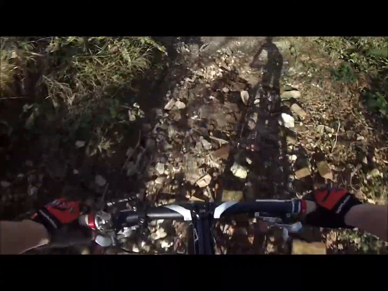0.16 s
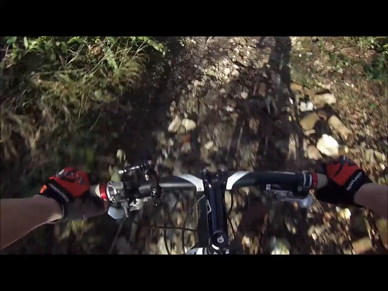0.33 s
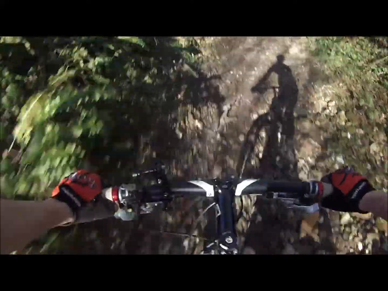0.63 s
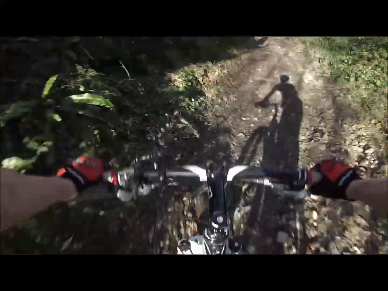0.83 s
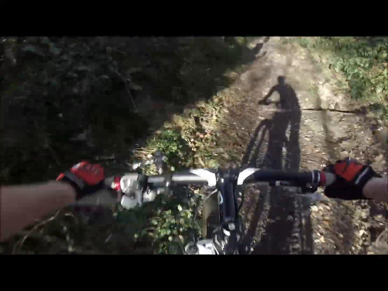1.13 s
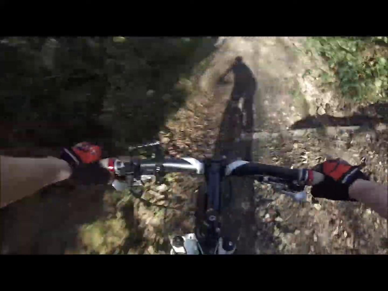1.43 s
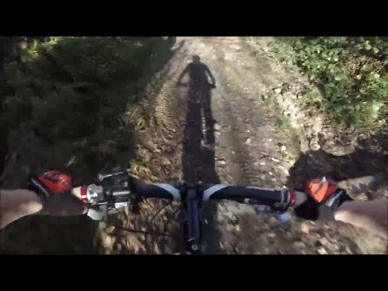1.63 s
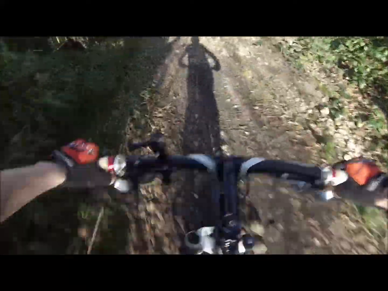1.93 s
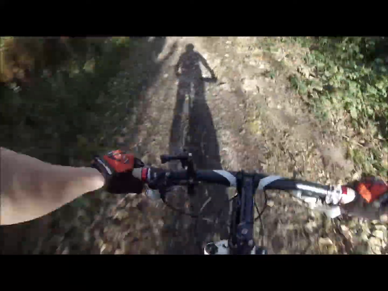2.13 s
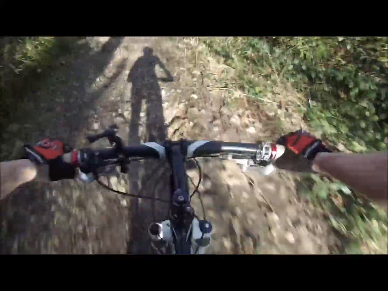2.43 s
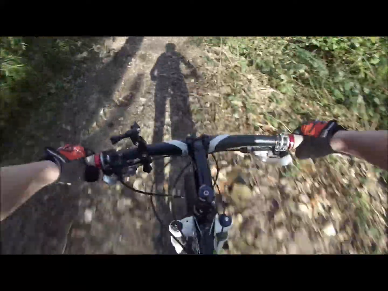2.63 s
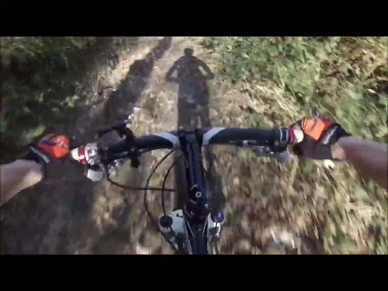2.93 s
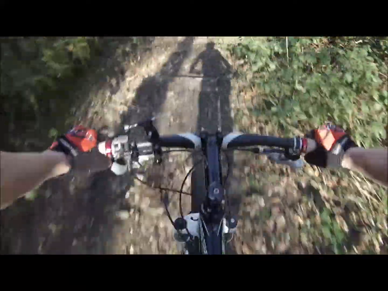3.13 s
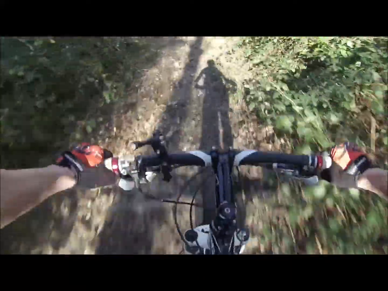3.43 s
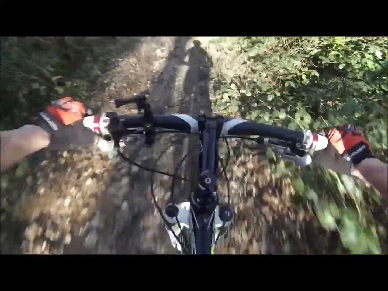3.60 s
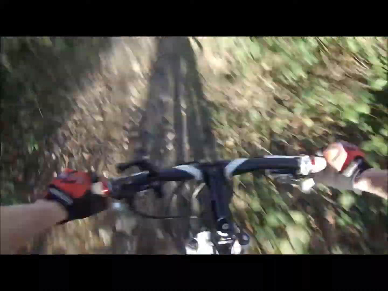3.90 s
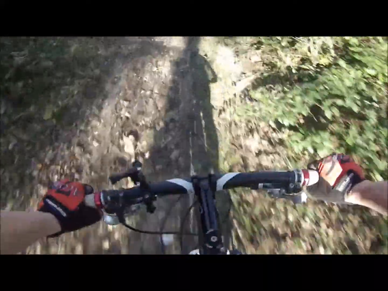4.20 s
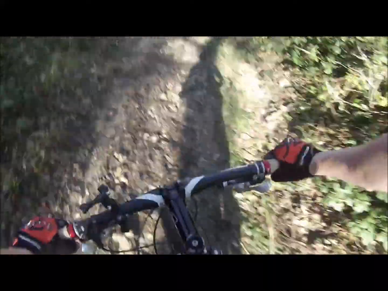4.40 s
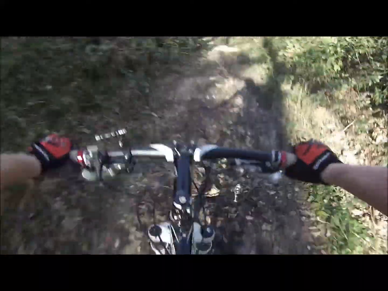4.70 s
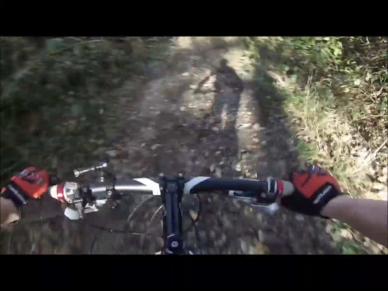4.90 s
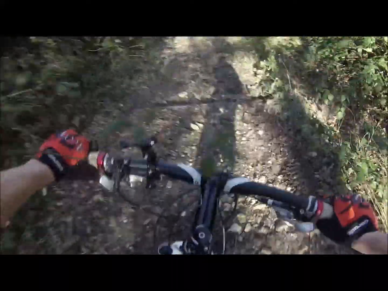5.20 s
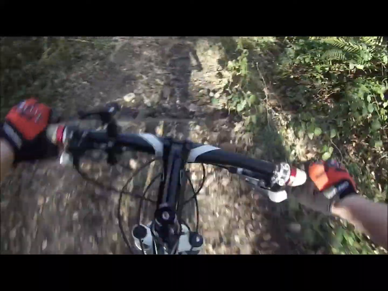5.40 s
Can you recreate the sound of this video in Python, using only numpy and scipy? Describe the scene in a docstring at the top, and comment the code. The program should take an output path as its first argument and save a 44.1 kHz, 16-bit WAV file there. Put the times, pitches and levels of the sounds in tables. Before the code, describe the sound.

A mountain bike rides down a stony dirt trail, heard close from a cased microphone on the rider's chest. The tyres crunch and fizz over gravel throughout, and quick, irregular bumps each bring a dull thump and a rattling spray over a low rumble. Flung stones clack against the bike and the chain chinks now and then. From about halfway, the frame gives several hard, hollow knocks.

```python
"""Mountain bike on a stony trail

A downhill ride, heard from a cased camera on the rider's chest. The tyres crunch over gravel; each bump
thumps the case and sets off a rattling spray. Flung stones clack against the bike, the frame gives
hard hollow knocks and the chain chinks. The shaken case rumbles, and its resonances colour the fizz."""
import sys
import numpy as np
from scipy import signal
from scipy.io import wavfile

SR = 44100
rng = np.random.default_rng(int(sys.argv[2]) if len(sys.argv) > 2 else 0)


def waveform_to_disk(signal):
    """Save audio, clipped to [-1, 1], as 16-bit WAV at the path in sys.argv[1]."""
    frames = np.transpose(np.atleast_2d(signal))
    scaled = np.clip(frames, -1, 1) * 32767
    samples = np.round(scaled).astype(np.int16)
    wavfile.write(sys.argv[1], SR, samples)


N = 244755
TIME = np.arange(N) / SR


def amp(db):
    """Decibels to gain."""
    return 10 ** (np.asarray(db) / 20)


def unit(x):
    """Scales to rms 1."""
    return x / np.sqrt(np.mean(x ** 2) + 1e-20)


def add(mix, s, sound):
    """Mixes a sound in at time s."""
    part = mix[max(round(s * SR), 0):][:len(sound)]
    part += sound[:len(part)]


def fader(curve):
    """Gain over time from a dB curve."""
    return amp(np.interp(TIME, *np.transpose(curve)))


def colour(x, spectrum, peaks=(), size=16384):
    """Minimum-phase EQ: a broad curve plus narrow peaks and dips."""
    hz = abs(np.fft.fftfreq(size, 1 / SR))
    f, db = np.transpose(spectrum)
    db = np.interp(np.log(hz + 1), np.log(f + 1), db)
    for centre, width, lift in peaks:
        db = db + lift / (1 + (2 * (hz - centre) / width) ** 2)
    log_response = np.conj(signal.hilbert(np.log(amp(db))))
    impulse = np.fft.ifft(np.exp(log_response)).real
    return signal.fftconvolve(x, impulse)[:len(x)]


def noise(spectrum, n=N):
    """Noise of rms 1 through an EQ curve of (f/Hz, level/dB) points."""
    return unit(colour(rng.standard_normal(n), spectrum))


def wander(depth_db, per_s):
    """A gain that drifts at random, by depth_db rms."""
    knots = rng.standard_normal(N // 20)
    return amp(depth_db * unit(np.interp(TIME * per_s, np.arange(len(knots)), knots)))


def grit(per_s, spread_db):
    """Tiny random impacts, a few much larger than the rest."""
    size = amp(spread_db * np.minimum(rng.exponential(1, N), 4))
    return unit(size * rng.choice([-1, 1], N) * (rng.random(N) < per_s / SR))


def ring(modes, tilt_db_per_oct=0, rise_s=0.0013):
    """Dying modes of alternating sign; the tilt brightens those above 700 Hz."""
    t = np.arange(SR // 6) / SR
    out = np.zeros(len(t))
    for k, (hz, db, t60) in enumerate(modes):
        lift_db = tilt_db_per_oct * max(np.log2(hz / 700), 0)
        out += (-1) ** k * amp(db + lift_db - 60 * t / t60) * np.cos(2 * np.pi * hz * t)
    return out * (1 - np.exp(-t / rise_s))


# Fader ride of the tyres rolling between bumps: t/s, level/dB
ROLL_FADER = [(0, -41), (.17, -42.5), (.24, -48.5), (.33, -37), (.64, -41.5), (.85, -40), (1.4, -44.5),
              (1.9, -46), (2.15, -43), (2.33, -45.5), (2.75, -42.5), (3.12, -37.5), (3.53, -49),
              (3.72, -43), (4.02, -49.5), (4.68, -40.5), (4.98, -41.5), (5.5, -47)]
# Coarse gravel crunch, heard through the case: f/Hz, level/dB
CRUNCH_EQ = [(300, -11), (520, -21), (690, -11.5), (860, -16), (1080, -9), (1350, -1), (1560, 2),
             (1880, -8.5), (2110, -3.5), (2400, -10.5), (2730, -8), (2950, -52), (4000, -53.5)]
# Fine sandy fizz, heard through the case: f/Hz, level/dB
FIZZ_EQ = [(2000, -26.5), (2900, -1.5), (3900, -4), (4300, -6.5), (5050, 2), (5600, -8), (6400, -7),
           (7300, -19), (8100, -20), (9800, -23), (10500, -19), (11300, -25.5), (13500, -29.5),
           (15500, -46)]
# Narrow peaks and dips of the case: f/Hz, width/Hz, gain/dB
CASE_RESONANCES = [(3120, 210, 5.5), (3190, 130, -5.5), (3493, 126, 7), (3610, 120, -3), (3980, 76, 8),
                   (6450, 220, -7.5), (7670, 210, 4.5), (8660, 380, 3.5)]
def gravel():
    """Stones crunch and sand fizzes under the tyres, swelling into a spray at every bump."""
    rolling = fader(ROLL_FADER) * wander(depth_db=2.3, per_s=30)  # uneven ground
    clumps = wander(depth_db=1.8, per_s=150)
    crunch = unit(colour(grit(per_s=3000, spread_db=1.5) * clumps, CRUNCH_EQ))
    sand = grit(per_s=16000, spread_db=2) * clumps
    fizz = unit(colour(sand, FIZZ_EQ, CASE_RESONANCES))
    coarse = amp(-5.5) * crunch + amp(-7.5) * pebbles(CRUNCH_EQ, 1210, 2723, decay_s=0.0053)
    fine = amp(-4.5) * fizz + amp(-10.5) * pebbles(FIZZ_EQ, 2986, 9070, decay_s=0.0018)
    spray = spray_envelope()
    coarse_gain = np.hypot(amp(4) * rolling, spray)
    fine_gain = np.hypot(amp(-8) * rolling, amp(-10) * spray)
    return coarse * coarse_gain + fine * fine_gain


def pebbles(spectrum, low_hz, high_hz, decay_s, count=20):
    """Single pebbles tick out of the gravel, each with a pitch of its own."""
    t = np.arange(SR // 40) / SR
    hits = grit(per_s=240, spread_db=3.5)
    stone = rng.integers(0, count, N)
    out = np.zeros(N)
    for k, hz in enumerate(np.geomspace(low_hz, high_hz, count)):
        tick = np.sin(2 * np.pi * hz * t) * np.exp(-t / decay_s) * (1 - np.exp(-t * hz))
        gain = amp(np.interp(hz, *np.transpose(spectrum)))
        out += gain * signal.oaconvolve(hits * (stone == k), tick)[:N]
    return unit(out)


# Fader ride of the camera shake: t/s, level/dB
SHAKE_FADER = [(0, -30.5), (.2, -32.5), (.36, -27), (.66, -23.5), (.9, -21), (1.15, -29.5), (1.42, -27),
               (1.66, -38.5), (1.8, -32.5), (2.65, -31), (3.08, -24.5), (3.48, -33.5), (3.64, -29.5),
               (3.82, -19.5), (4.05, -28), (4.45, -23), (4.92, -26.5), (5.55, -33)]
# Sub-bass sway of the rider: f/Hz, level/dB
SWAY_EQ = [(3, -32.5), (9, 6.5), (14, 8), (21, 2), (32, -4.5), (50, -12.5), (80, -19), (130, -25),
           (300, -80)]
# Low rumble of the shaken case: f/Hz, level/dB
RUMBLE_EQ = [(30, 8), (60, -20), (100, -1), (140, -3), (200, 0.5), (250, -9.5), (310, -21.5), (420, -22.5),
             (650, -24.5), (1500, -72)]
def shaking():
    """The camera sways with the rider and rumbles with the ground; bumps swell the rumble."""
    shake = fader(SHAKE_FADER)
    sway = amp(4.5) * noise(SWAY_EQ) * shake
    rumble = noise(RUMBLE_EQ) * wander(depth_db=2.5, per_s=30)
    return sway + rumble * np.hypot(amp(-12) * shake, amp(-11) * spray_envelope())


# Bumps in the trail, cued at their middles: t/s, length/s, rattle level/dB, thump level/dB
BUMP_CUES = [(0.056, 0.021, -39, -31), (.125, 0.025, -34.5, -34), (0.286, 0.039, -32, -15),
             (0.412, 0.016, -32.5, -25), (0.506, 0.015, -35, -32), (0.542, .025, -31.5, -7.5),
             (0.584, 0.024, -32, -12), (0.746, 0.067, -30.5, -7.5), (0.807, 0.022, -30, -7.5),
             (0.873, 0.031, -31, -7), (0.901, 0.054, -32.5, -7.5), (1.066, 0.013, -32.5, -10.5),
             (1.122, 0.035, -27.5, -29), (1.18, 0.014, -35, -28), (1.223, 0.037, -32.5, -18.5),
             (1.336, 0.053, -31.5, -34), (1.475, 0.053, -31.5, -18), (1.639, 0.075, -39.5, -48),
             (1.72, 0.037, -37.5, -28), (1.831, 0.054, -36, -13.5), (2.087, 0.035, -33, -10),
             (2.116, 0.033, -35.5, -30), (2.785, 0.03, -31.5, -30), (2.85, 0.078, -63, -8),
             (2.928, 0.022, -36, -22), (3.029, 0.019, -32.5, -9), (3.085, 0.024, -23, -20),
             (3.155, 0.028, -23.5, -11), (3.292, .025, -29, -18), (3.382, 0.04, -26.5, -34),
             (3.626, 0.052, -31.5, -31), (3.706, 0.019, -29, -8.5), (3.755, 0.064, -37, -24),
             (3.843, 0.029, -39, -7.5), (3.861, 0.012, -27, 3), (3.96, 0.015, -26, -2.5),
             (3.974, 0.022, -30, -4), (4.108, 0.012, -32.5, -8), (4.132, 0.049, -31.5, -27),
             (4.2, 0.073, -35.5, -32), (4.378, 0.019, -35.5, -19), (4.463, 0.017, -37.5, -9.5),
             (4.499, 0.018, -32, -28), (4.534, 0.022, -29.5, -16.5), (4.613, 0.019, -33.5, -28),
             (4.77, 0.063, -29.5, -19), (4.837, 0.02, -24.5, -20), (4.909, 0.024, -25, -0.5),
             (5.06, .042, -32, -38), (5.121, 0.058, -29.5, -21), (5.213, 0.094, -32, -14.5),
             (5.34, 0.042, -35.5, -24), (5.418, 0.056, -33.5, -20.5), (5.545, 0.022, -26.5, -23)]
# The case passes thumps up to about 250 Hz: f/Hz, level/dB
THUMP_EQ = [(20, 4), (100, 1), (200, 3), (290, -0.5), (420, -7), (700, -29), (2000, -27)]
def thumps(push_share=0.17, boom_db=-14, scrape_db=-26):
    """Each bump is a pointed push of pressure, a soft rebound and a boom; hard ones scrape the case."""
    rebound, push, booms = np.zeros((3, N))
    for s, length, _, db in BUMP_CUES:
        from_peak = np.hypot(TIME - s, 0.0004) / (push_share * length)  # long bumps push softly
        push += amp(db) * np.exp(-from_peak)
        rebound += 0.27 * amp(db) * np.exp(-from_peak / 4)
        add(booms, s, amp(db + boom_db) * boom())
    scrape = noise([(300, 21), (900, 15), (2200, 6), (3200, -3), (6500, -48), (9000, -30), (15000, -39)])
    return colour(rebound - push, THUMP_EQ) + booms + amp(scrape_db) * scrape * push ** 2


def spray_envelope(steepness=4.3):
    """Gain of the rattling spray: it swells and dies within each bump."""
    power = np.zeros(N)
    for s, length, db, _ in BUMP_CUES:
        from_middle = abs(2 * (TIME - s) / length)
        power += amp(db) ** 2 * np.exp(-2 * from_middle ** steepness)
    return np.sqrt(power)


def boom(centre_hz=95.8, spread_oct=0.49, decay_s=0.013):
    """A low, quickly damped swing of frame and tyres, at a new pitch each time."""
    t = np.arange(SR // 6) / SR
    hz = centre_hz * 2 ** (spread_oct * rng.uniform(-1, 1))
    return np.sin(2 * np.pi * hz * t) * np.exp(-t / decay_s) * (1 - np.exp(-2 * hz * t))


# The loudest stones that hit the bike: t/s, level/dB, f/Hz, decay/s
CLACK_CUES = [(0.102, -23.5, 1470, 0.0046), (.279, -24, 1670, 0.0019), (0.295, -32, 1430, .003),
              (.438, -19, 2010, 0.0026), (.493, -20, 1650, 0.0032), (0.893, -20.5, 1376, 0.0089),
              (1.128, -23, 1580, 0.0066), (1.943, -14, 1690, 0.0011), (2.411, -25, 1390, 0.0063),
              (2.943, -16, 1430, 0.0042), (2.993, -20, 1480, 0.0012), (3.145, -34, 1520, .006),
              (3.285, -24, 1480, 0.013), (3.373, -20, 1420, 0.0047), (3.860, -15, 2110, 0.0012),
              (4.114, -21.5, 1300, 0.0055), (4.592, -17.5, 1400, 0.0044), (5.105, -16, 1453, 0.008)]
def stone_clacks(rise_s=0.00068):
    """A flung stone rings briefly and chatters as it glances off."""
    out, t = np.zeros(N), np.arange(SR // 20) / SR
    for s, db, hz, decay_s in CLACK_CUES:
        envelope = np.exp(-t / decay_s) * (1 - np.exp(-t / rise_s))
        tone = 0.74 * np.sin(2 * np.pi * hz * t)
        chatter = 0.5 * noise(CRUNCH_EQ, len(t))
        add(out, s - rise_s, amp(db) * envelope * (tone + chatter))
    return out


# Hollow knocks of the frame: t/s, level/dB
KNOCK_CUES = [(.297, -17.5), (.536, -21), (.755, -19.5), (1.381, -10), (1.827, -23.5), (2.503, 0),
              (2.762, -23.5), (3.077, 1), (3.796, -7), (4.038, -1.5), (4.291, -7.5), (4.964, -18),
              (5.439, -27)]
# Ring of the frame and case: f/Hz, level/dB, t60/s
FRAME_MODES = [(95, -12, 0.054), (197, -11, .04), (334, -11, 0.021), (694, -3.5, .027),
               (1113, -10.5, 0.021), (1260, -7, 0.02), (1420, -2.5, 0.017), (1720, -14, 0.018),
               (2210, -11, 0.016), (2500, -30, 0.016), (5100, -28, 0.0072)]
def frame_knocks(rebound_s=0.00149, rebound=0.32, contact_s=0.00083, detune=0.0096):
    """A padded blow and its instant rebound ring the frame and case, with a brief grind and a boom."""
    out, t = np.zeros(N), np.arange(SR // 50) / SR
    contact = np.exp(-(t / contact_s * 4 - 2) ** 2)
    contact /= contact.sum()
    grind_eq = [(400, -9.5), (950, 4), (1400, -5.5), (2500, -8), (6000, -30), (15000, -57)]
    for s, db in KNOCK_CUES:
        onset = s - rebound_s
        tilt_db_per_oct = 8 + 0.3 * db  # harder blows are brighter
        for at, share in [(onset, 1), (s, rebound)]:
            # Each blow lands elsewhere, so the modes shift in pitch and level.
            modes = [(hz * (1 + detune * rng.normal()), mode_db + rng.normal(), t60)
                     for hz, mode_db, t60 in FRAME_MODES]
            body = np.convolve(ring(modes, tilt_db_per_oct), contact)
            add(out, at, 0.57 * share * amp(db) * body)
        grind = noise(grind_eq, len(t)) * np.exp(-t / 0.0036)
        add(out, onset, amp(db - 24) * grind)
        add(out, onset, amp(db - 16) * boom())
    return out


def click(at_s=0.3823, db=-11.5, decay_s=0.0054):
    """One sharp, dry click, like an edit cut: the signal jumps and dies away."""
    age = TIME - at_s
    return amp(db) * (age > 0) * np.exp(-abs(age) / decay_s)


# Bright chinks of the chain: t/s, level/dB
CHINK_CUES = [(.469, -35.5), (.663, -35), (1.230, -39), (1.939, -36), (3.86, -38), (4.112, -18)]
# Ring of the struck metal: f/Hz, level/dB, t60/s
METAL_MODES = [(2680, 6, 0.021), (3050, 9, 0.0086), (3990, 2, .025), (5650, 5, 0.017), (6340, -3, 0.046),
               (6550, 4, 0.024), (6800, -2, 0.026), (7800, -19, 0.066), (10900, -17, .015)]
def chain_chinks(scuff_decay_s=0.0028):
    """The chain strikes metal, with a short scuff at contact."""
    out, metal = np.zeros(N), ring(METAL_MODES)
    t = np.arange(len(metal)) / SR
    scuff_eq = [(1500, -50), (3000, -23), (7500, 19), (9500, -4), (15000, -9)]
    for s, db in CHINK_CUES:
        scuff = noise(scuff_eq, len(t)) * np.exp(-t / scuff_decay_s)
        add(out, s, amp(db) * (0.27 * metal + 0.21 * scuff))
    return out


def scene():
    """All sources reach the one microphone in the case, so both channels are alike."""
    mix = gravel() + shaking() + thumps() + frame_knocks() + stone_clacks() + chain_chinks() + click()
    return np.array([mix, mix])


def record(dry, threshold_db=-8, attack_s=0.0054, release_db_per_s=70, cutoff_hz=15600):
    """A limiter ducks the mix just after the hardest hits; a low-pass trims the top end."""
    peak_db = 20 * np.log10(abs(dry).max(0) + 1e-9)
    over_db = np.maximum(peak_db - threshold_db, 0)
    release_db = TIME * release_db_per_s
    held_db = np.maximum.accumulate(over_db + release_db) - release_db
    lag = np.exp(-1 / (attack_s * SR))
    duck_db = signal.lfilter([1 - lag], [1, -lag], held_db)
    lowpass = signal.firwin(255, cutoff_hz, window=("kaiser", 8), fs=SR)
    return signal.oaconvolve(dry * amp(-duck_db), lowpass[None], "same")


dry = scene()
out = record(dry)
waveform_to_disk(out)
```